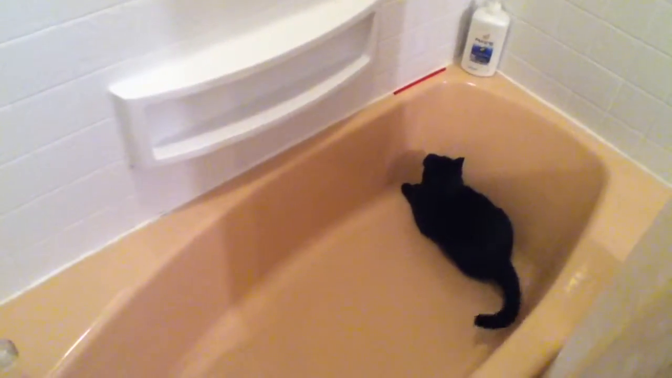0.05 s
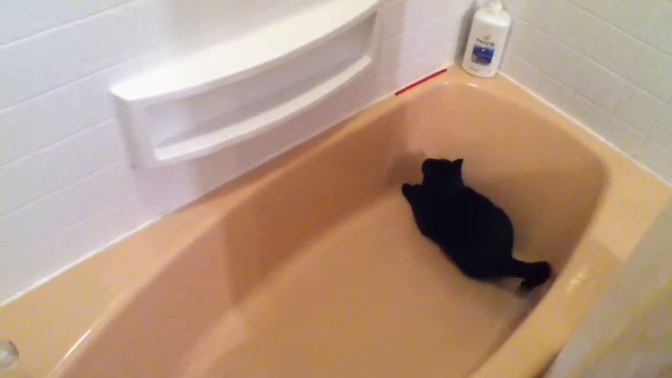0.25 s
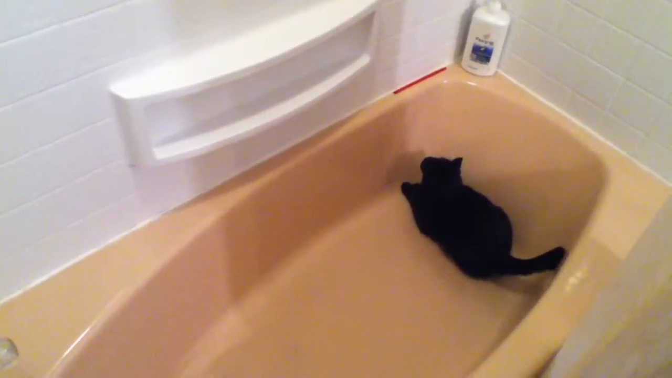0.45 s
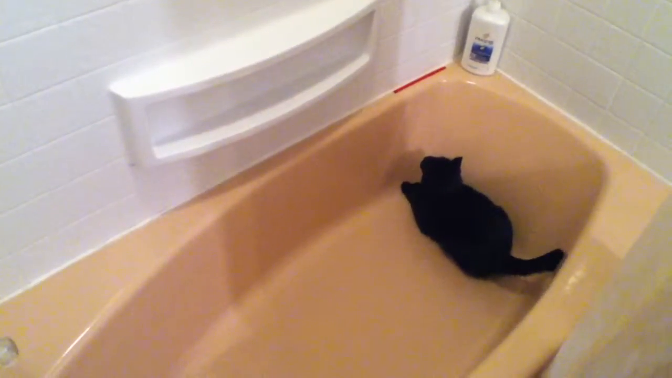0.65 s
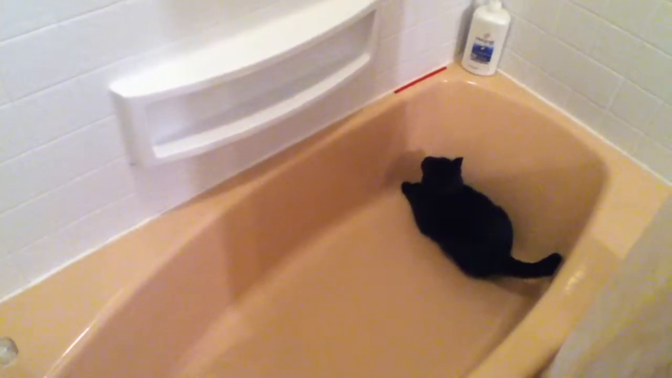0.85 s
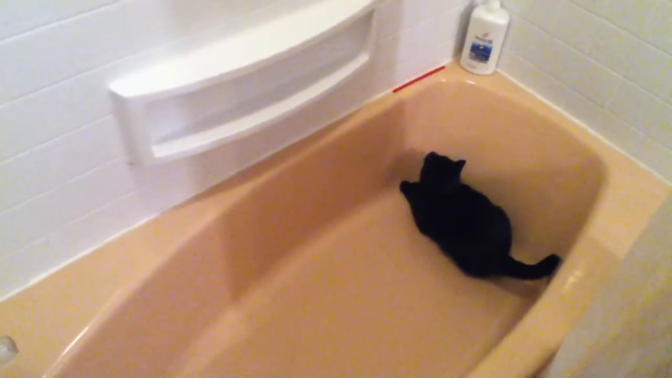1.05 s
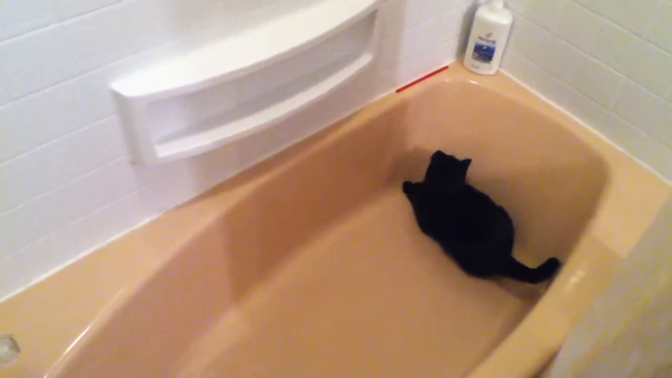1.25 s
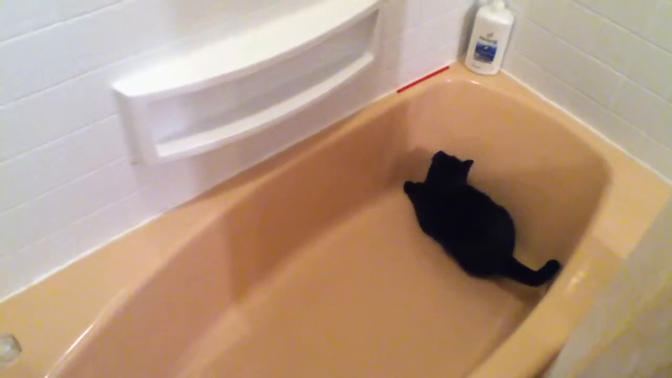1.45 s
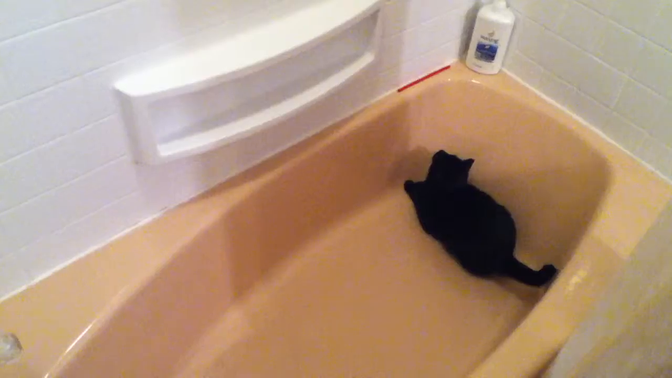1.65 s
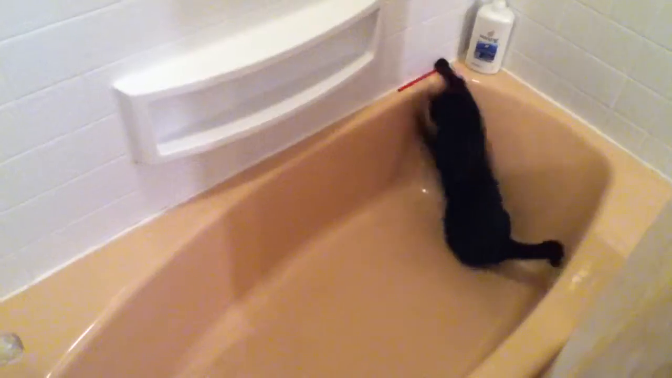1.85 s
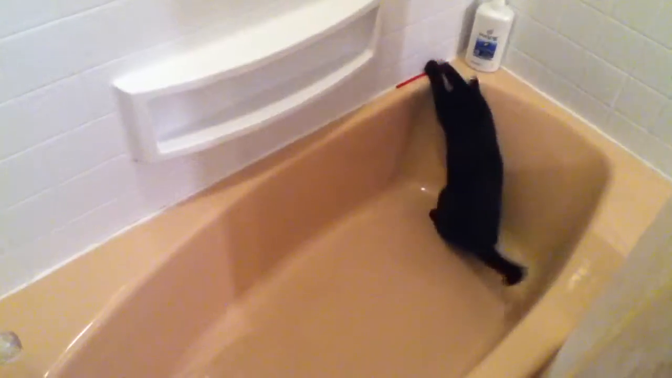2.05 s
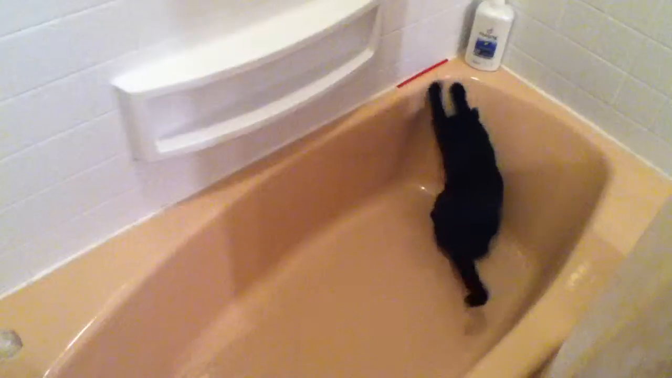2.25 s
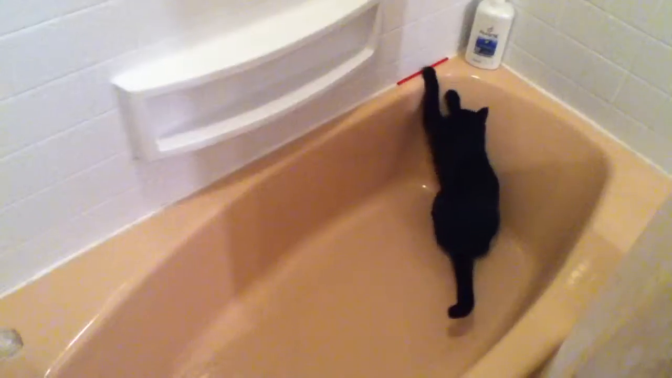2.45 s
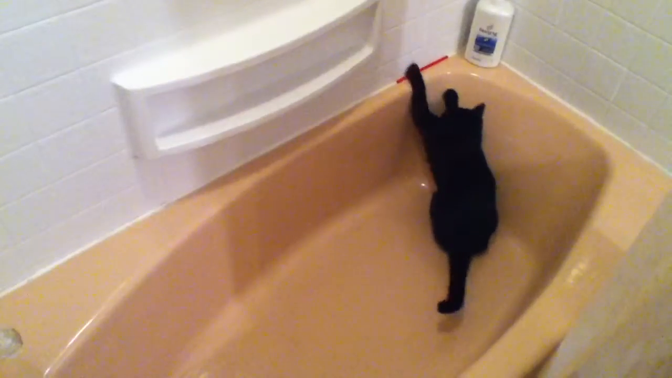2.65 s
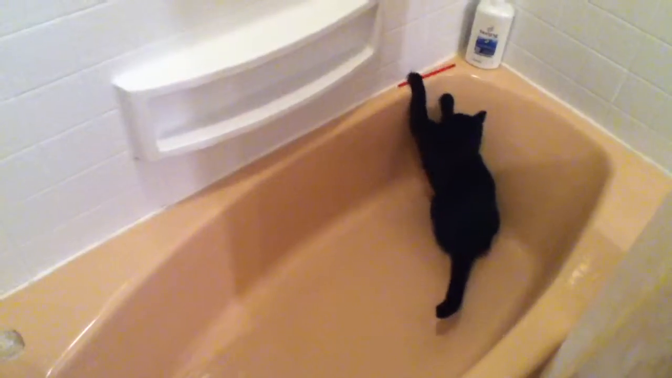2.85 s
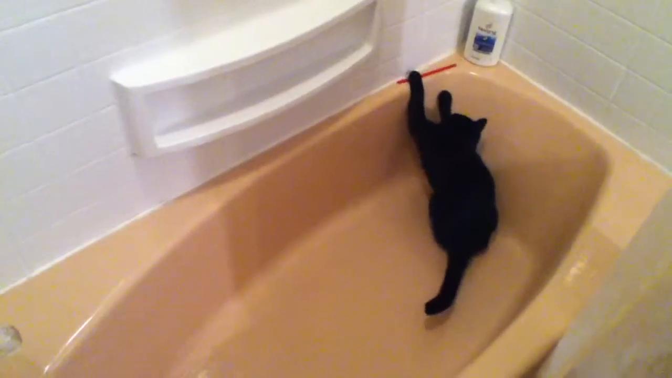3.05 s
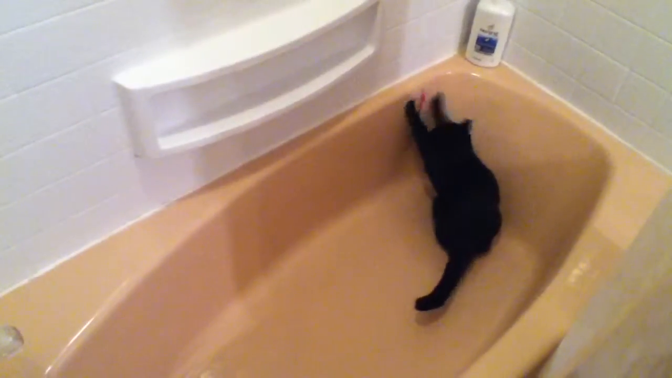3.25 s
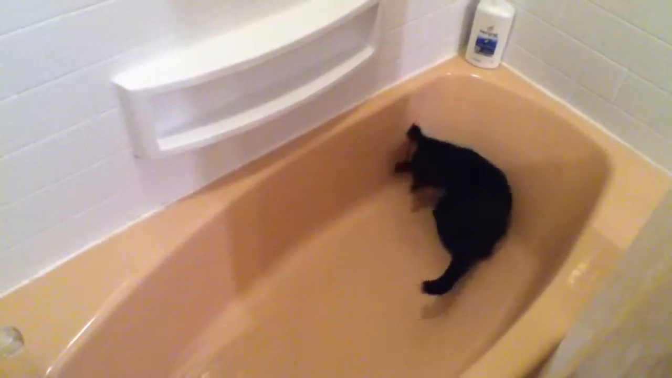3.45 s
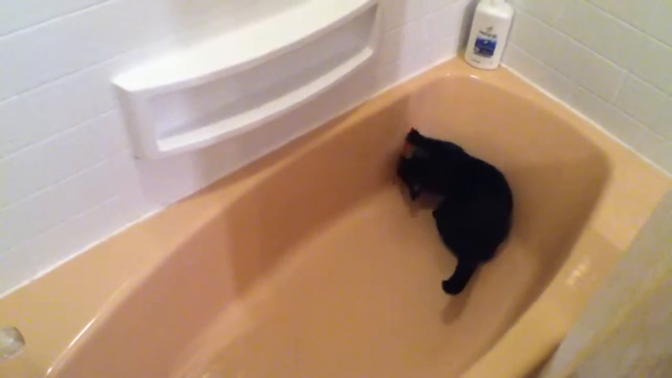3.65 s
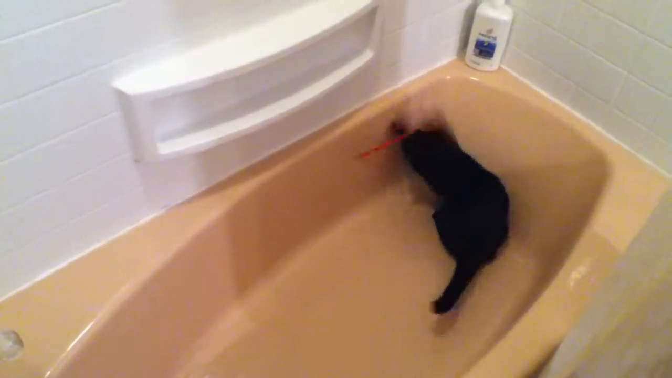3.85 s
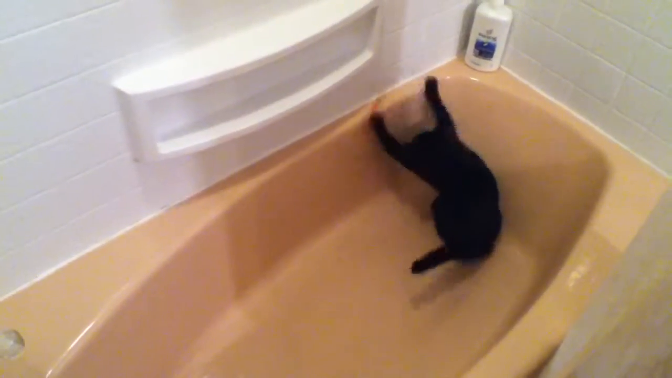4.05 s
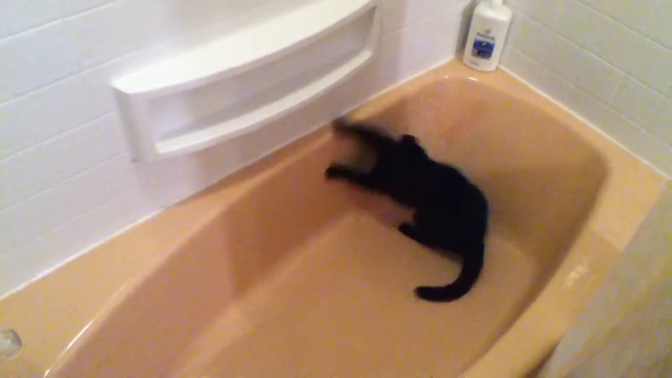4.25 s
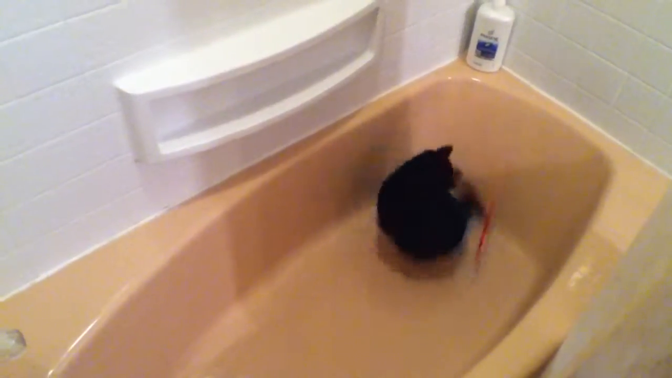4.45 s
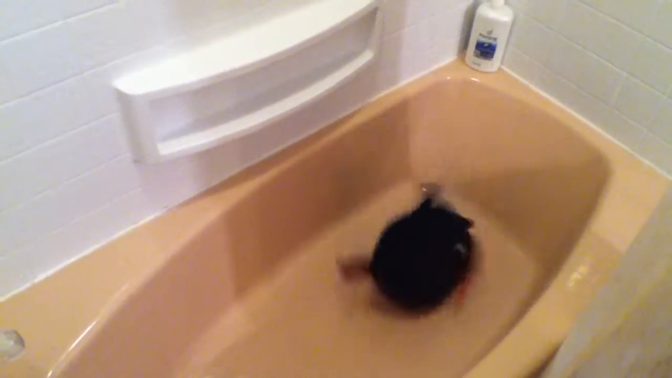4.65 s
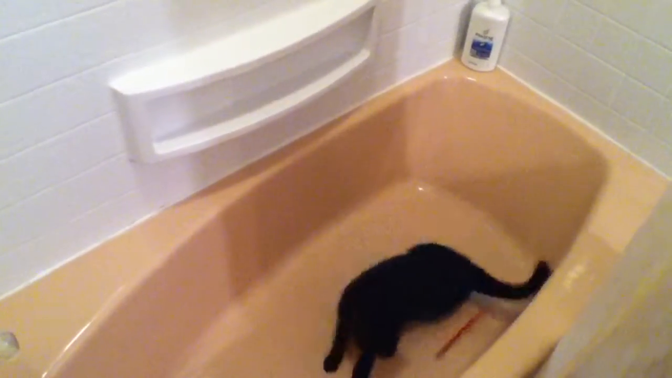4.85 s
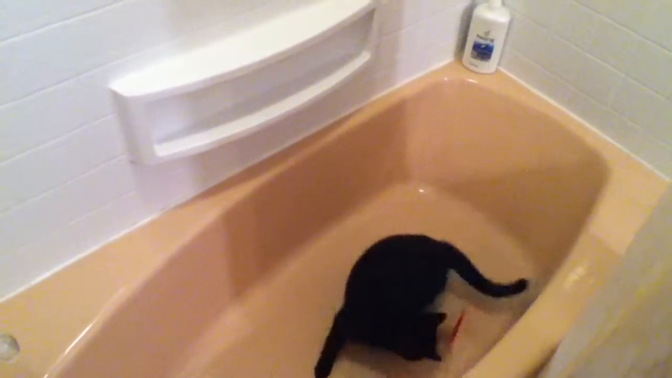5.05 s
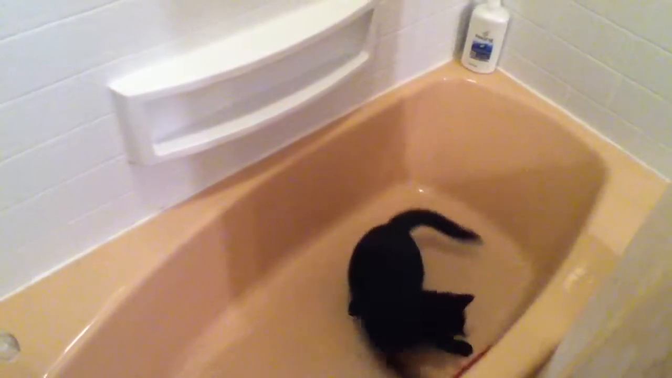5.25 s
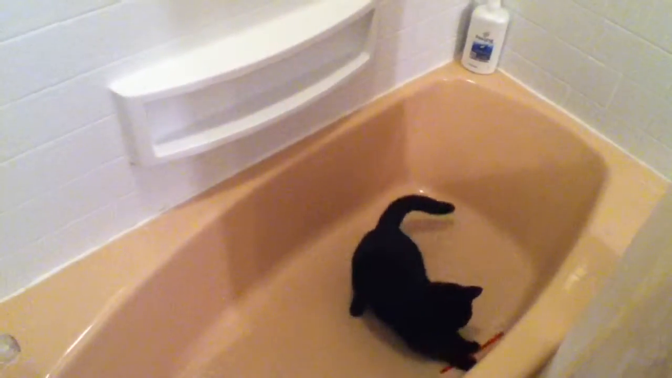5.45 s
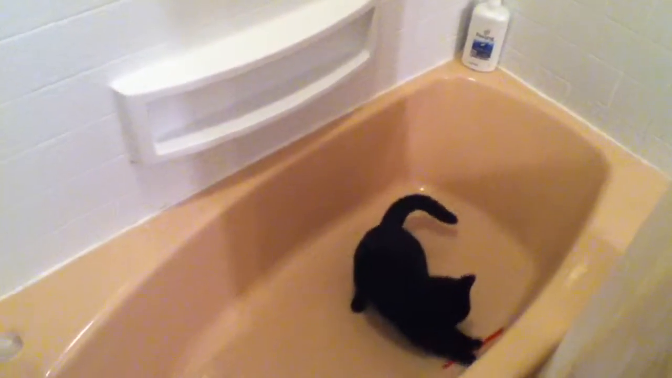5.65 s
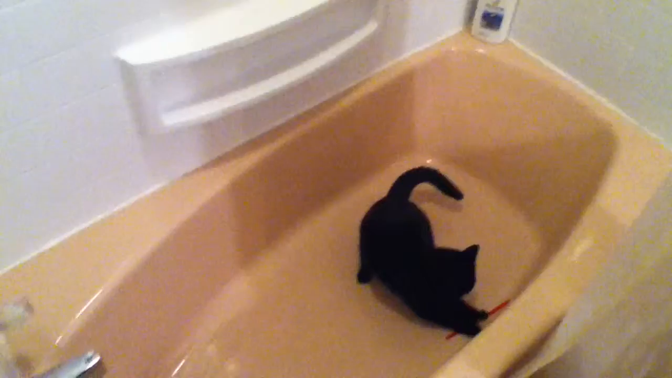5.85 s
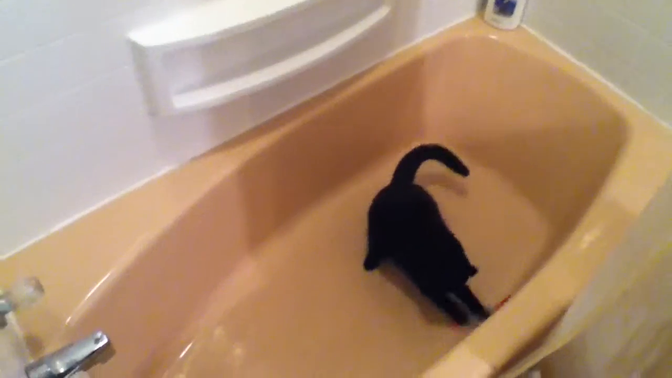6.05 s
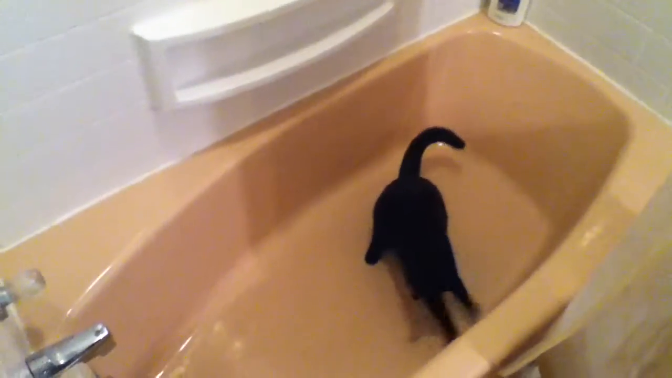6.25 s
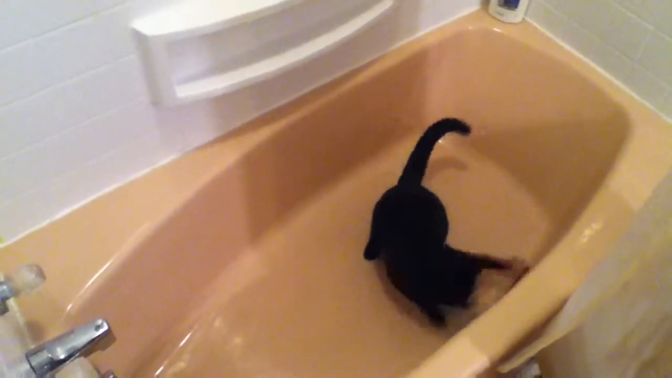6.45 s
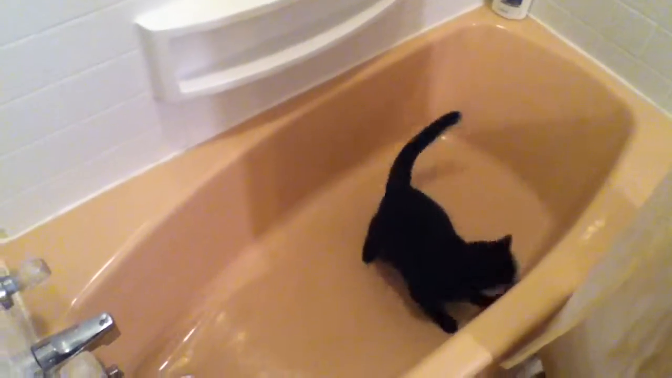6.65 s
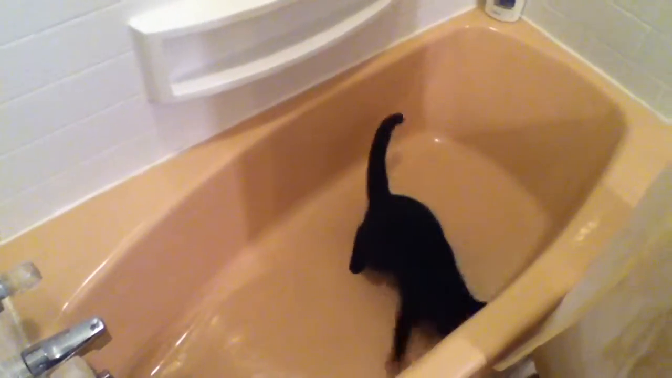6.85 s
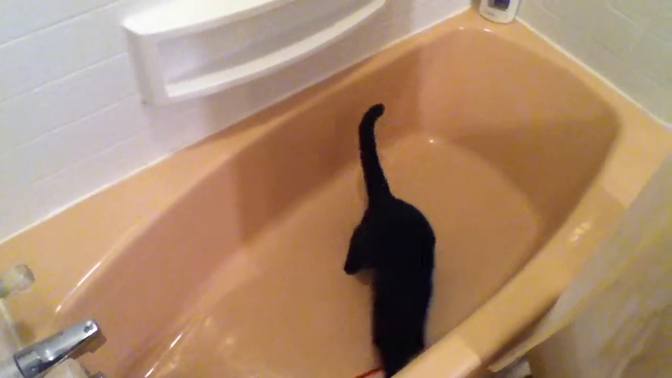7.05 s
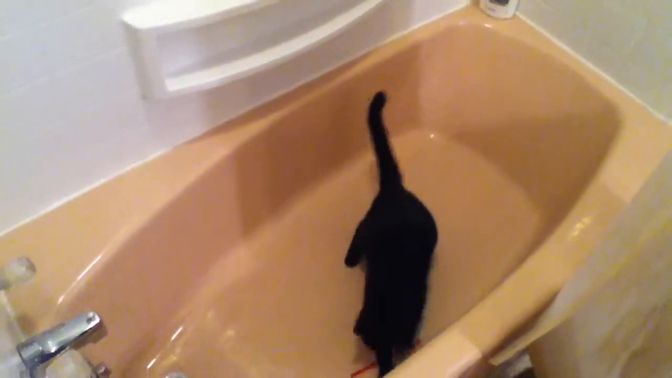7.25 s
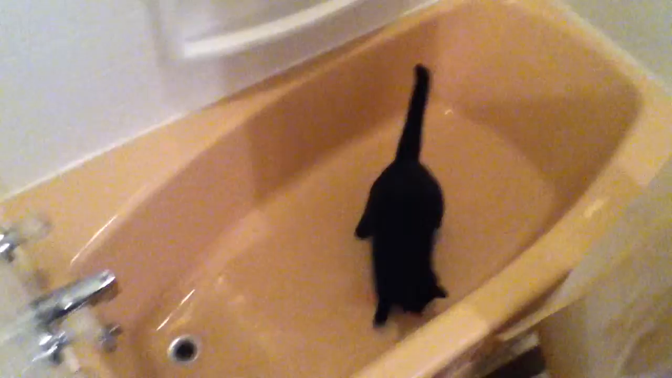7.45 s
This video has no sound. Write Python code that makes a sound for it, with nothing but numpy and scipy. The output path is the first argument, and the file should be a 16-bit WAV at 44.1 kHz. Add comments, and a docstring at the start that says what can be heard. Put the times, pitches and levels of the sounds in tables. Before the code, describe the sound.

A cat bats a plastic straw around an empty bathtub, with light clicks, paw knocks and hollow thumps over a humming fan.

```python
"""In a small tiled room, a cat bats a plastic straw around an empty bathtub while a fan hums.
Paws knock on the tub wall, and paws and straw scuff over the enamel. The straw clicks, and the air
inside it rings like a short open pipe. The whole tub booms when the cat jumps down and pounces.
There is one tiny dry tick, and near the end the straw squeaks as it sticks and slips."""
import sys
import numpy as np
from scipy import signal
from scipy.fft import rfft, irfft
from scipy.io import wavfile
from scipy.ndimage import uniform_filter1d

SR = 44100
rng = np.random.default_rng(int(sys.argv[2]) if len(sys.argv) > 2 else 0)


def file_out(sig):
    """Save sig as 16-bit WAV at sys.argv[1]."""
    # one column per channel
    cols = np.atleast_2d(sig).T
    # limit, then scale
    lim = np.clip(cols, -1, 1)
    pcm = np.round(lim * 32767).astype(np.int16)
    wavfile.write(sys.argv[1], SR, pcm)


N = 331632
TAIL = 24000  # samples allowed for a hit to die away
HZ = np.fft.rfftfreq(2048, 1 / SR)  # the frequencies at which a click is shaped

# The tiled room's echo. Each row: frequency in Hz, seconds to fade by 60 dB.
ROOM_FADE = [(100, 0.55), (250, 0.48), (660, 0.54), (1740, 0.35), (4600, 0.3), (9000, 0.27), (15000, 0.24)]
# The fan's tones. Each row: pitch in Hz, level in dB.
FAN_TONES = [(60, -64.5), (120, -60.5), (196, -46), (209, -56.5), (392, -54.5)]
# The fan's rush of air. Each row: frequency in Hz, relative level in dB.
AIR_SPECTRUM = [(20, -22), (45, -20.5), (90, -2), (200, 0), (300, -4), (400, -2), (560, -9), (760, -14),
                (1400, -17), (2500, -24.5), (5500, -30.5), (9500, -28), (12500, -35.5), (16000, -38.5)]
# Narrow resonances that colour the fan's rush of air in the room.
# Each row: frequency in Hz, width in Hz, strength in dB.
AIR_PEAKS = [(139, 6.9, 4), (233, 23, 5), (343, 26, 4.5), (397.4, 4.4, 11.5), (490, 15.7, 5.5),
             (628, 37, 5.5), (809, 5.2, 9), (1079, 8, 8), (1190, 7.3, 7.5), (1180, 15, -12),
             (1287, 16, 4.5), (1463, 7.1, 10.5)]
# Paws hit the tub wall. Each row: start in seconds, level in dB, claw share (0 all pad, 1 all claw).
PAW_KNOCKS = [(1.995, -19.5, 0.021), (2.7915, -37, 0.53), (4.3188, -27.5, 0.57), (4.358, -32, .45),
              (4.905, -25, 1), (4.908, -25.5, 0.78), (4.938, -29.5, 0.56), (6.354, -44, 0.77),
              (6.599, -37.5, 0), (6.621, -36, 0), (7.020, -37, 0.69)]
# The tone colour of a knock. Each row: frequency in Hz, relative level in dB.
KNOCK_SPECTRUM = [(60, -14), (200, -2), (500, 5.5), (650, -2), (930, 1.5), (1400, -0.5), (1900, -3),
                  (2450, -6.5), (3900, -7.5), (4700, -9.5), (8000, -19.5), (11000, -21.5), (16000, -45)]
# Notes of the tub's wall and rim. Each row: pitch in Hz, relative level in dB, seconds to fade by 60 dB.
WALL_MODES = [(379, 5.5, 0.12), (445, 3, 0.086), (749, 1, 0.21), (860, -4, 0.19), (960, 3.5, 0.18),
              (1010, -9, 0.15), (1188, -11, 0.29), (1440, -5, 0.065), (1620, -10, 0.13), (1844, 2.5, 0.11),
              (2150, 5, 0.067), (3110, -5, 0.099), (4000, -17, 0.052)]
# A paw or the straw slides over the enamel. Each row: start in seconds, length in seconds, level in dB.
SLIDES = [(2.258, 0.058, -48.5), (2.552, 0.054, -48.5), (2.919, 0.096, -47.5), (3.405, 0.12, -44),
          (3.541, .068, -43.5), (3.764, 0.17, -44), (4.336, 0.064, -37.5), (4.882, .028, -42),
          (5.155, 0.16, -45.5), (5.248, 0.11, -43.5), (5.401, 0.05, -51.5), (5.459, .036, -45.5),
          (6.141, 0.091, -50), (6.416, 0.073, -51), (6.788, 0.11, -46), (6.993, 0.097, -36.5),
          (7.067, 0.23, -48.5), (7.314, 0.087, -49.5)]
# The tone colour of a plastic click. Each row: frequency in Hz, relative level in dB.
CLICK_SPECTRUM = [(100, -9), (400, 0), (800, -1.5), (1050, -7), (1300, 1), (1900, 1.5), (3300, -0.5),
                  (6500, 0), (7600, -0.5), (8800, -1), (12500, -5.5), (16000, -17)]
# Harmonics of the air in the straw, plus two notes of its wall.
# Each row: frequency in Hz, width in Hz, relative strength in dB.
STRAW_PEAKS = [(837, 84, 2), (1654, 42, 3.5), (2000, 90, -20), (2557, 35, 3), (3328, 190, 7),
               (4160, 102, 6), (4995, 82, 5.5), (5830, 120, -1), (6440, 100, -7), (6720, 230, -1)]
# The straw is hit or lands. Each row: start in seconds, level in dB, hardness (-1 dull, 1 sharp),
# boost of the lower tones in dB, seconds by which one end touches first.
STRAW_TAPS = [(2.307, -47.4, 0.021, -15, 0), (2.539, -40.3, -0.42, 4.5, 0.015),
              (2.923, -47, -0.39, 6, 0.0077), (3.133, -44.5, 0.92, -6, 0.012),
              (3.383, -31, .35, 0.5, 0.0012), (3.468, -41, 0.076, 0, 0.0039),
              (3.899, -29.5, -0.52, -8, 0.0037), (3.989, -35.5, 0.37, 9, 0),
              (4.116, -38.5, -.85, -1, 0.0036), (4.153, -30, -0.19, 8.5, 0.0035),
              (4.171, -25.5, 0.094, 2, 0), (4.221, -26.5, 0.39, -2, 0.0091),
              (4.520, -28.5, 0.7, 9.5, 0.0029), (4.528, -28, -1, 3, 0), (4.692, -32, 0.31, 3, 0.0077),
              (5.078, -40, 0.18, -4, 0.022), (5.159, -41.5, 0.13, 4, 0.0056),
              (5.456, -37, -0.57, -3, 0.0057), (5.470, -40.5, 0.63, -1, 0.012),
              (6.357, -34, -.2, 3, 0.0058), (6.564, -48, -0.41, -11, 0.014), (6.612, -26.5, 0.17, 1, .006),
              (7.009, -38, 0.35, -9, 0.0031), (7.148, -44, -0.014, -10, 0.0032)]
# The cat lands on the tub floor. Each row: start in seconds, level in dB, centre of the blow in Hz.
LANDINGS = [(4.130, -32.5, 188), (4.319, -33, 137), (4.347, -23.5, 120), (4.3568, -22.5, 205),
            (4.3673, -26, 255), (4.398, -25.5, 318), (4.808, -32, 79), (4.909, -10, 355), (4.948, -17, 402),
            (6.625, -33, 249)]
# The tone colour of a padded blow. Each row: frequency in Hz, relative level in dB.
THUD_SPECTRUM = [(30, -38), (60, -16), (95, 7.5), (160, -4.5), (240, 4.5), (480, -3), (620, -9),
                 (1000, -14), (3000, -17)]
# Low notes of the tub's shell. Each row: pitch in Hz, relative level in dB, seconds to fade by 60 dB.
SHELL_MODES = [(87.7, -1, 0.42), (115, -26, 0.2), (195.4, -2, 0.5), (274, -13, 0.1), (289.5, 2, 0.5),
               (320, 7, 0.099), (350.4, 5.5, 0.21), (390.5, 0.5, 0.32), (432.6, 4, 0.33), (486, 1.5, 0.42),
               (545, -9.5, 0.39), (552, -23, 0.31), (720, -5, 0.21), (823, -5, 0.15), (900, -13, 0.32)]
# Straw squeaks. Each row: start in seconds, length in seconds, first and last pitch in Hz, level in dB.
SQUEAKS = [(7.015, 0.027, 3170, 2510, -32.5), (7.048, 0.028, 2870, 2560, -40),
           (7.143, 0.0086, 5140, 4900, -42.5)]


def amp(db):
    """Turns decibels into a number to multiply by."""
    return 10 ** (np.asarray(db) / 20)


def unit_energy(x):
    """Scales a sound so that its squared samples add up to 1."""
    return x / np.sqrt(np.sum(x ** 2) + 1e-20)


def unit_rms(x):
    """Scales a sound so that its average power is 1."""
    return unit_energy(x) * np.sqrt(len(x))


def hit_level(db, sound):
    """Gives a hit as much energy as 20 ms of steady sound at this level."""
    return amp(db) * np.sqrt(0.02 * SR) * unit_energy(sound)


def look_up(points, hz):
    """Reads between the rows of a table, spacing frequencies by octaves."""
    row_hz, value = np.transpose(points)
    return np.interp(np.log(hz + 1), np.log(row_hz), value)


def add(mix, start_s, sound):
    """Adds a sound to the mix at its start time."""
    part = mix[round(start_s * SR):][:len(sound)]
    part += sound[:len(part)]


def above(hz, edge_hz):
    """A smooth step from 0 below an edge to 1 above it."""
    return hz ** 4 / (hz ** 4 + edge_hz ** 4)


def bump(hz, centre_hz, octaves):
    """A bell curve of height 1 around a frequency."""
    return np.exp(-0.5 * (np.log2((hz + 1) / centre_hz) / octaves) ** 2)


def resonances(peaks, hz):
    """The power that a set of resonant peaks adds at each frequency."""
    return sum(amp(db) ** 2 / (1 + (2 * (hz - centre) / width) ** 2) for centre, width, db in peaks)


def drift(rate_hz):
    """A slow random wobble, mostly slower than the given rate."""
    hz = np.fft.rfftfreq(N, 1 / SR)
    return unit_rms(irfft(rfft(rng.standard_normal(N)) * np.exp(-(hz / rate_hz) ** 2), N))


def pulse(colour_db):
    """A click with this tone colour and its energy packed at the start (minimum phase)."""
    log_gain = np.log(amp(np.r_[colour_db, colour_db[-2:0:-1]]) + 1e-6)
    click = np.fft.ifft(np.exp(np.conj(signal.hilbert(log_gain)))).real
    return np.pad(unit_energy(click), (0, TAIL - len(click)))


def room(sound, direct_db, tub_db, tub_fade_s):
    """Sound arrives directly, as quick echoes between the tub walls, and as the room's fading wash."""
    t = np.arange(TAIL) / SR
    hz, frame_s, noise = signal.stft(rng.standard_normal(TAIL), SR, nperseg=256)
    fade = amp(-60 * frame_s / look_up(ROOM_FADE, hz)[:, None])
    wash = signal.istft(noise * fade, SR, nperseg=256)[1][:TAIL]
    wash *= 1 - np.exp(-t / 0.0063)
    echoes = rng.choice([-1, 1], TAIL) * (rng.random(TAIL) < 7000 / SR)  # about 7000 a second
    response = unit_energy(wash) + amp(tub_db) * unit_energy(echoes * amp(-60 * t / tub_fade_s))
    response[0] += amp(direct_db)
    return signal.fftconvolve(sound, unit_energy(response))


def fan(air_db=-45, waver_db=2.0, fuzz=0.43):
    """Motor and blade tones waver in the swirling air, over a steady rush."""
    t = np.arange(N) / SR
    bins_hz = np.fft.rfftfreq(N, 1 / SR)
    colour = amp(look_up(AIR_SPECTRUM, bins_hz)) * np.sqrt(1 + resonances(AIR_PEAKS, bins_hz))
    sound = amp(air_db) * unit_rms(irfft(rfft(rng.standard_normal(N)) * colour, N))
    for hz, db in FAN_TONES:
        phase = 2 * np.pi * hz * t + 0.0017 * hz * drift(9.8)  # higher tones wander more
        tone = np.sin(phase) * amp(waver_db * drift(3.8)) + fuzz * drift(10) * np.cos(phase)
        sound += amp(db) * unit_rms(tone)
    return sound


def tub_ring(modes, force_db, build_s):
    """The tub's own notes (modes) build up as the wave spreads through it, then die away."""
    hz, db, fade_s = np.transpose(modes)[:, :, None]
    t = np.arange(TAIL) / SR
    size = amp(db + force_db(hz) + rng.standard_normal(hz.shape))
    size[::2] *= -1  # neighbouring modes move in opposite directions
    waves = size * amp(-60 * t / fade_s) * np.cos(2 * np.pi * hz * t)
    return unit_energy(waves.sum(0) * (1 - np.exp(-t / build_s)))


def paw_knock(db, claw):
    """A soft pad makes the tub wall ring; a claw gives a brighter crack and less ring."""
    bass_db, treble_db, ring_db = -5 - 6 * claw, -5.5 + 10 * claw, -4 - 6 * claw

    def force_db(hz):
        claw_db = 14.5 * claw * bump(hz, 2800, octaves=0.34)
        return claw_db + bass_db * (1 - above(hz, 1110)) + treble_db * above(hz, 2700)
    contact = pulse(look_up(KNOCK_SPECTRUM, HZ) + force_db(HZ))
    crack = room(contact, direct_db=-5.5, tub_db=5, tub_fade_s=0.1)[:TAIL]
    ring = tub_ring(WALL_MODES, force_db, build_s=0.0084)
    return hit_level(db, unit_energy(crack) + amp(ring_db) * ring)


def straw_pipe(ring_db, scatter_db=3.0, detune=0.0067):
    """The boost in dB from the straw's resonances; each touch varies their pitch and strength."""
    hz, width, db = np.transpose(STRAW_PEAKS)
    weight, shift = rng.standard_normal((2, len(hz)))
    peaks = zip(hz * (1 + detune * shift), width, db + ring_db + scatter_db * weight)
    return 10 * np.log10(1 + resonances(peaks, HZ))


def slide(length_s, db, light_stroke_db=-48, slips_per_s=5000):
    """Many tiny slips, each a faint click into the straw; pressing harder sounds duller."""
    stroke = np.sqrt(np.hanning(round(length_s * SR)))
    size = rng.standard_normal(TAIL)[:len(stroke)]
    slipping = rng.random(TAIL)[:len(stroke)] < slips_per_s / SR
    slips = unit_rms(size * slipping) * stroke
    treble_db = -2 - 0.81 * (db - light_stroke_db)
    contact_db = treble_db * above(HZ, 5600) - 8 * (1 - above(HZ, 3800))
    click = pulse(look_up(CLICK_SPECTRUM, HZ) + contact_db + straw_pipe(ring_db=3))
    return amp(db) * room(signal.fftconvolve(slips, click), direct_db=3, tub_db=-6, tub_fade_s=0.034)


def straw_tap(db, hardness, body_db, snap_db=-30):
    """A plastic click sets the air in the straw ringing; a harder touch is higher and sharper."""
    treble_db, bright_hz = 1 + 12 * hardness, 4400 * 2 ** hardness
    contact_db = body_db * (1 - above(HZ, 2200)) + treble_db * above(HZ, 5700)
    contact_db += 4.5 * bump(HZ, bright_hz, octaves=0.26)
    colour_db = look_up(CLICK_SPECTRUM, HZ) + contact_db + straw_pipe(ring_db=6.5)
    click = room(pulse(colour_db), direct_db=-15.5, tub_db=4, tub_fade_s=0.069)
    snap = pulse(colour_db + 20 * above(HZ, 7000))  # bright and dry, added very faintly to the click
    return hit_level(db, unit_energy(click)[:TAIL] + amp(snap_db) * snap)


def landing(db, centre_hz, middling_hz=246):
    """The cat's weight booms in the tub; a quicker footfall is higher, wider and rings the shell more."""
    octaves_up = np.log2(centre_hz / middling_hz)
    spread = 2 ** (0.78 + 0.25 * octaves_up)

    def force_db(hz):
        band = above(hz, centre_hz / spread) * (1 - above(hz, centre_hz * spread))
        return 10 * np.log10(band + 1e-9)
    contact = pulse(look_up(THUD_SPECTRUM, HZ) + force_db(HZ))
    thud = room(contact, direct_db=1.5, tub_db=3.5, tub_fade_s=0.3)[:TAIL]
    ring = tub_ring(SHELL_MODES, force_db, build_s=0.0079)
    boom = unit_energy(thud) + amp(4.5 * octaves_up) * ring
    rumble_cut = signal.butter(3, 60, "highpass", fs=SR, output="sos")
    return hit_level(db, signal.sosfilt(rumble_cut, boom))


def tick(hz, db):
    """A tiny dry tick: a few vibrations with no echo."""
    return hit_level(db, pulse(40 * (bump(HZ, hz, octaves=0.51) - 1)))


def straw_squeak(length_s, start_hz, end_hz, db, roughness=0.046):
    """The straw sticks and slips on the enamel, in an unsteady tone that falls as it slows."""
    count = round(length_s * SR)
    jitter = unit_rms(uniform_filter1d(rng.standard_normal(TAIL), size=30))[:count]
    hz = np.linspace(start_hz, end_hz, count) * (1 + roughness * jitter)
    tone = np.sin(2 * np.pi * np.cumsum(hz) / SR) * signal.windows.tukey(count, 0.5)
    return hit_level(db, room(tone, direct_db=6, tub_db=5, tub_fade_s=0.053))


def scene():
    """Lays the sounds of the cat's play over the fan."""
    mix = fan()
    for start_s, db, hardness, body_db, lead_s in STRAW_TAPS:
        add(mix, start_s, straw_tap(db, hardness, body_db))
        if lead_s > 0.0025:  # one end touches first, more softly
            add(mix, start_s - lead_s, straw_tap(db - 5, hardness, body_db))
    for source, table in (paw_knock, PAW_KNOCKS), (landing, LANDINGS), (slide, SLIDES):
        for start_s, *settings in table:
            add(mix, start_s, source(*settings))
    add(mix, 5.1888, tick(hz=5200, db=-41.5))
    for start_s, *settings in SQUEAKS:
        add(mix, start_s, straw_squeak(*settings))
    return mix[None]


def record(dry):
    """Removes the very highest treble, above 15900 Hz."""
    treble_cut = signal.firwin(511, 15900, window=("kaiser", 9), fs=SR)
    return signal.oaconvolve(dry, treble_cut[None], "same")


dry = scene()
out = record(dry)
file_out(out)
```